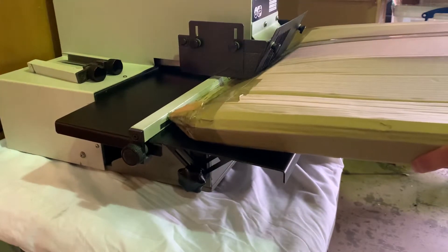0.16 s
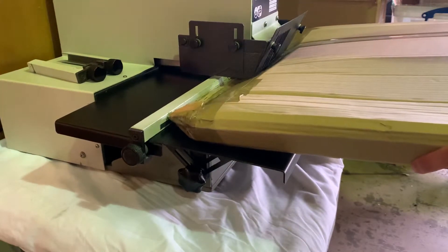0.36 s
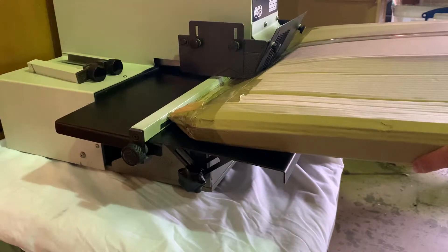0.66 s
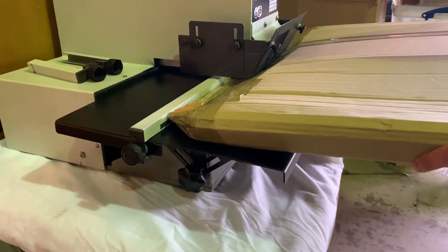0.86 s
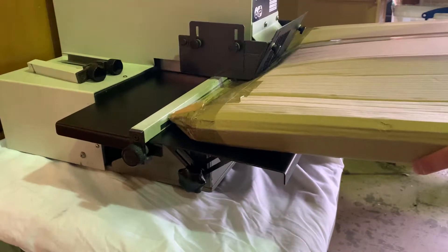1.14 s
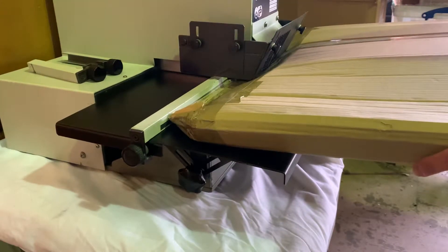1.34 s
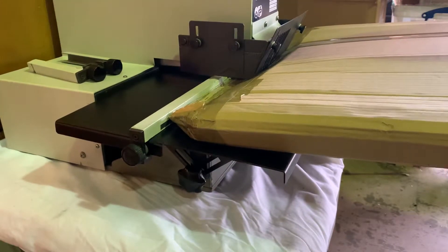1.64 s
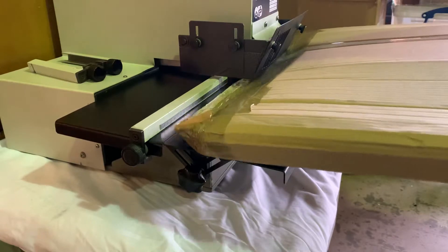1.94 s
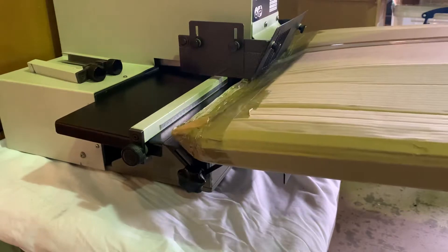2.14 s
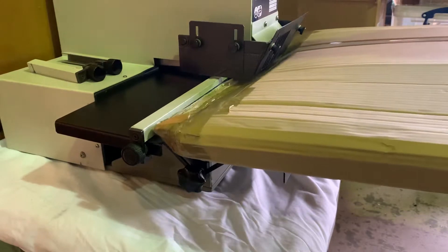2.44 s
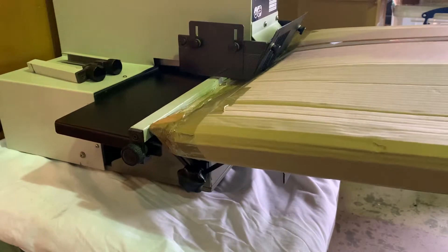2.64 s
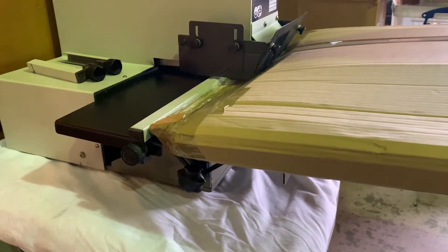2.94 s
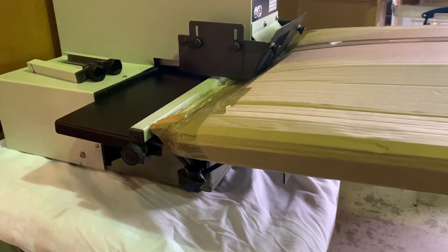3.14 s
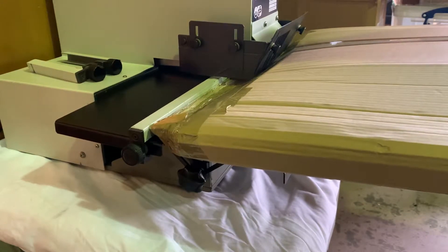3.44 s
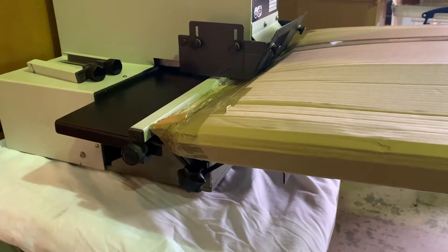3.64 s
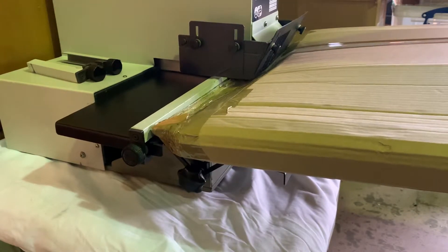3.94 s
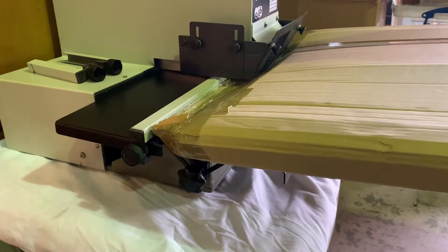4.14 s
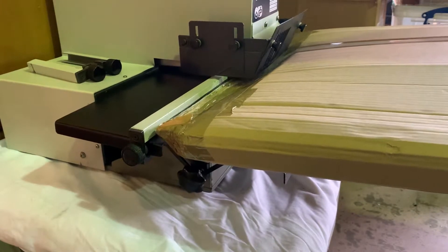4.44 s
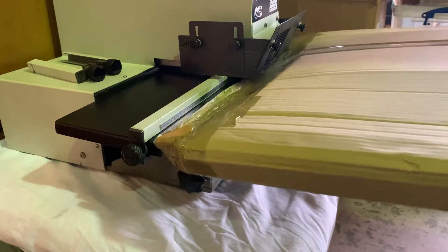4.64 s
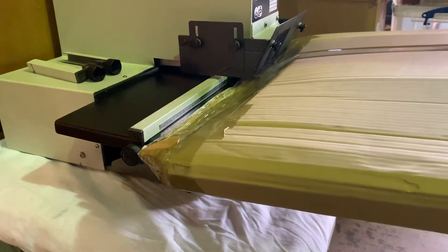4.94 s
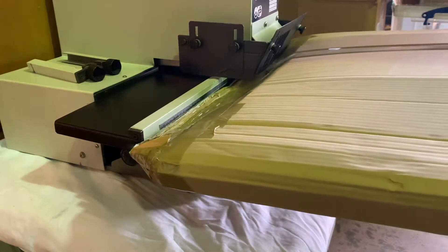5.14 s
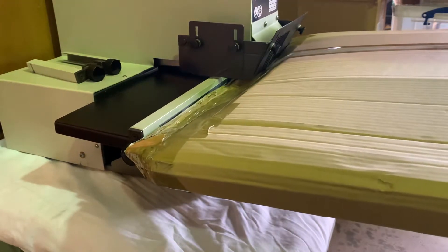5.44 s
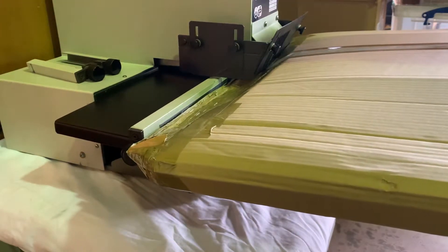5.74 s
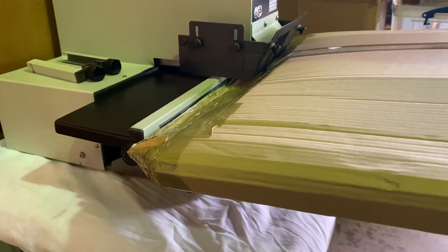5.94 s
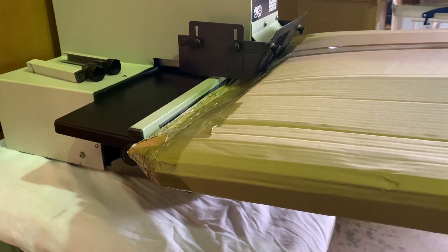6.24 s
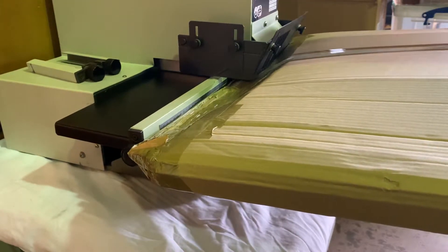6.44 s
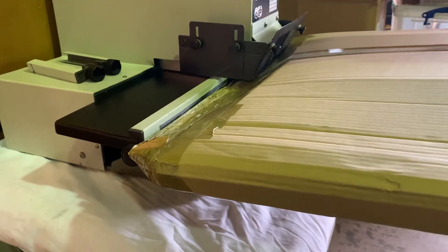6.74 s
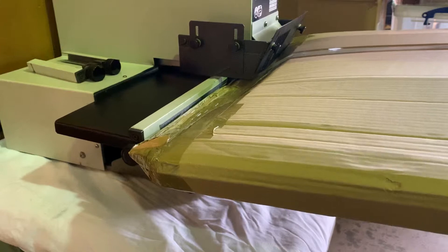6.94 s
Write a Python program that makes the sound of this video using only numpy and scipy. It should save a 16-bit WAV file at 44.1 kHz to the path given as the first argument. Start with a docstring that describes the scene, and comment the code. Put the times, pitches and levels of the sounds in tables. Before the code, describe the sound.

An electric stapler clatters through cardboard three times, with the wrapped cardboard sliding and crackling between strokes in a quiet workshop.

```python
"""A quiet workshop, a two-port stereo microphone close to an electric stapler on a steel table.
It runs three cycles: trigger, clutch, cam, staple blow, release and return. Each contact chatters
into the frame and the steel head; cam and gears rub and the table rumbles while the drive turns.
Between cycles the wrapped cardboard slides, knocks and crackles. Ventilation hums far off."""
import sys
import numpy as np
from scipy import signal
from scipy.fft import rfft, irfft, next_fast_len
from scipy.io import wavfile

SR = 44100
rng = np.random.default_rng(int(sys.argv[2]) if len(sys.argv) > 2 else 0)


def waveform_to_disk(signal):
    """Save audio, clipped to [-1, 1], as 16-bit WAV at the path in sys.argv[1]."""
    frames = np.transpose(np.atleast_2d(signal))
    scaled = np.clip(frames, -1, 1) * 32767
    samples = np.round(scaled).astype(np.int16)
    wavfile.write(sys.argv[1], SR, samples)


N = 312228

# when the clutch bites and how late the cam follows (their sum starts cam time): clutch_s, cam_lag_s
CYCLE_TIMES = [(0.764, -0.002), (3.539, 0.0026), (6.13, 0.012)]
# how alike the two microphone ports hear spread-out sound: frequency_hz, shared_power_fraction
PORT_LIKENESS = [(60, 0.91), (250, 1), (600, 0.53), (1100, 0.8), (1600, 0.27), (6000, 0.095), (8500, 0.077),
                 (10000, 1)]


def from_db(db):
    """Decibels to gain."""
    return 10 ** (np.asarray(db) / 20)


def rms_one(x):
    """Scale to unit rms."""
    return x / np.sqrt(np.mean(x ** 2) + 1e-20)


def power_sum(levels_db):
    """Levels of unrelated sounds add as powers."""
    return 10 * np.log10(np.sum(10 ** (np.array(levels_db) / 10), axis=0))


def in_time(rows):
    """Columns of a curve, one value a sample."""
    times_s, *columns = np.transpose(rows)
    return [np.interp(np.arange(N) / SR, times_s, column) for column in columns]


def every_cycle(curve):
    """Level curves in cam time, played once a cycle, silent outside."""
    quiet = [-120] * (len(curve[0]) - 1)
    padded = [(curve[0][0] - .01, *quiet), *curve, (curve[-1][0] + .01, *quiet)]
    return power_sum([in_time([(clutch_s + lag_s + t, *levels) for t, *levels in padded])
                      for clutch_s, lag_s in CYCLE_TIMES])


def at_hz(points, hz):
    """Read a spectrum on a log-frequency axis."""
    points = np.array(points)
    return np.interp(np.log(np.maximum(hz, 1)), np.log(points[:, 0]), points[:, 1])


def shaped(x, spectrum):
    """Colour a steady noise with rows of frequency_hz, gain_db."""
    return irfft(rfft(x) * from_db(at_hz(spectrum, np.fft.rfftfreq(N, 1 / SR))), N)


def band(x, low_hz, high_hz):
    """Causal band-pass."""
    sos = signal.butter(2, [low_hz, min(high_hz, .45 * SR)], "band", fs=SR, output="sos")
    return signal.sosfilt(sos, x)


def resonance(x, hz, width_hz):
    """Two-pole peak of gain 1."""
    r = np.exp(-np.pi * width_hz / SR)
    feedback = [1, -2 * r * np.cos(2 * np.pi * hz / SR), r * r]
    return signal.lfilter(np.array([1, 0, -1]) * (1 - r * r) / 2, feedback, x + 1e-18)


def grains(count, per_s, spread_db):
    """Random clicks of uneven size and sign."""
    sizes = from_db(spread_db * np.minimum(rng.exponential(1, count), 4)) * rng.choice([-1, 1], count)
    return sizes * (rng.random(count) < per_s / SR)


def blend_ports(spectra, size):
    """Three spectra become left and right: the first is shared, the others are each port's own."""
    alike = np.clip(at_hz(PORT_LIKENESS, np.fft.rfftfreq(size, 1 / SR)), 0, 1)
    shared, *own = spectra
    return np.sqrt(alike) * shared + np.sqrt(1 - alike) * np.array(own)


def two_ports(draw):
    """A wide source at the microphone, made from three draws of its sound."""
    return irfft(blend_ports(rfft([draw(), draw(), draw()]), N), N)


def room_tone():
    """Distant ventilation with a few faint motor lines."""
    # colour of the moving air: frequency_hz, gain_db
    air_spectrum = [(18, -31.5), (30, 1), (59, -14.5), (134, -15.5), (184, -13.5), (252, -27), (311, -29.5),
                    (780, -41), (844, -38.5), (8520, -76.5), (10800, -63.5), (16000, -85.5)]
    # motor hum: pitch_hz, width_hz, level_db
    motor_lines = [(770, 7.4, -70.5), (335, 12, -71.5), (592, 8.4, -76)]
    air = shaped(two_ports(lambda: rng.standard_normal(N)), air_spectrum)
    air = signal.sosfilt(signal.butter(2, 230, "high", fs=SR, output="sos"), air)
    hum = sum(from_db(level_db) * rms_one(resonance(rng.standard_normal(N), hz, width_hz))
              for hz, width_hz, level_db in motor_lines)
    return from_db(-55.5) * rms_one(air) + hum


def rubbing(levels_db, grit, rough_db):
    """Surfaces rubbing on steel: noise with a little grit, catching and slipping."""
    # colour of the low rasp: frequency_hz, gain_db
    rasp_spectrum = [(150, -17), (250, -5.5), (402, -11.5), (531, -8.5), (662, -20), (744, -15.5),
                     (4000, -22), (5200, -30.5), (8800, -120)]
    # colour of the high hiss: frequency_hz, gain_db
    hiss_spectrum = [(1500, -25), (2300, -4.5), (2900, -9.5), (5200, -8), (7000, -4.5), (10200, -4.5),
                     (13300, -7), (16000, -13.5)]

    def friction():
        return rng.standard_normal(N) + grit * rms_one(grains(N, per_s=300, spread_db=4.0))

    rasp_db, hiss_db, scrape_db = levels_db
    catch = from_db(rough_db * rms_one(band(rng.standard_normal(N), 11, 60)))
    scrape = rms_one(resonance(resonance(two_ports(friction), 3750, 600.0), 3750, 600.0))
    scrape += from_db(-7.0) * rms_one(resonance(two_ports(friction), 2300, 300.0))
    rasp = rms_one(shaped(two_ports(friction), rasp_spectrum))
    hiss = rms_one(shaped(two_ports(friction), hiss_spectrum))
    return catch * (from_db(scrape_db) * scrape + from_db(rasp_db) * rasp + from_db(hiss_db) * hiss)


def cardboard_slides():
    """Cardboard pushed over the table: each push speeds up, slows a little and stops."""
    # pushes, with levels at their fastest: start_s, fastest_s, stop_s, rasp_db, hiss_db, scrape_db
    pushes = [(-.3, 0, .04, -57, -59, -73), (1.562, 1.72, 1.946, -44, -37, -55),
              (2.101, 2.338, 2.58, -53, -57, -72), (2.734, 2.842, 2.91, -61, -65, -78),
              (3.0, 3.1, 3.13, -65.5, -64, -82), (4.34, 4.644, 4.76, -46, -48, -52),
              (4.81, 5.18, 5.24, -52, -57, -76), (5.3, 5.851, 6.1, -72.5, -80, -90),
              (6.885, 7.096, 8.6, -42, -44.5, -67)]
    rise_db, sag_db = np.array([3, 11, 10]), np.array([0.5, 7, 2])   # rasp, hiss, scrape
    start_db_per_s, stop_db_per_s = 302, 201
    curves = [in_time([(start_s - 1, *(top_db - rise_db - start_db_per_s)),
                       (start_s, *(top_db - rise_db)),
                       (fastest_s, *top_db),
                       (stop_s, *(top_db - sag_db)),
                       (stop_s + 1, *(top_db - sag_db - stop_db_per_s))])
              for start_s, fastest_s, stop_s, *top_db in pushes]
    return rubbing(power_sum(curves), grit=0.44, rough_db=1.0)


def table_rumble():
    """Each low mode of table and frame is a steady tone plus narrow noise, so that it wavers."""
    # shaking through one cycle: cam_time_s, rumble_db, table_db, panel_db
    cycle_shake = [(-.02, -70, -66, -60), (.02, -53, -53, -42.5), (.12, -47, -38.5, -38),
                   (.21, -36.5, -21.5, -31.5), (.25, -35.5, -33, -23), (.32, -30, -35.5, -30.5),
                   (.38, -39.5, -23.5, -24), (.46, -41, -34, -35.5), (0.511, -34, -36.5, -42.5),
                   (0.551, -43.5, -30.5, -51.5), (.61, -33, -30, -20.5), (.66, -45, -27, -18),
                   (.72, -30, -35, -26), (.85, -42, -35, -40), (1.2, -55.5, -45.5, -49),
                   (1.8, -70, -69, -58)]
    # murmur of table and building between cycles: time_s, rumble_db, table_db, panel_db
    murmur = [(0, -49.5, -46.5, -53), (.3, -47, -71, -52), (.7, -55, -65.5, -59.5), (2.2, -49, -51.5, -53),
              (2.8, -51.5, -66.5, -49), (3.45, -43.5, -54.5, -57.5), (4.9, -47, -51, -39.5),
              (5.3, -50.5, -65, -60), (5.92, -40.5, -56.5, -60.5), (7.08, -48, -49.5, -57)]
    # the rumble, table and panel modes: pitch_hz, width_hz, steady_power_fraction
    low_modes = [(53, 39, 0.1), (91.9, 16, 0.1), (178.6, 16, 0.45)]
    levels_db = power_sum([every_cycle(cycle_shake), in_time(murmur)])
    out, t = 0, np.arange(N) / SR
    for level_db, (hz, width_hz, steady) in zip(levels_db, low_modes):
        tone = np.sqrt(2 * steady) * np.sin(2 * np.pi * hz * t)
        waver = rms_one(resonance(resonance(rng.standard_normal(N), hz, width_hz), hz, width_hz))
        out = out + from_db(level_db) * (tone + np.sqrt(1 - steady) * waver)
    return out


def wrap_snaps():
    """Plastic wrap snaps: a double click through a short, high resonance, a wisp of crinkle behind."""
    # snaps of the wrap: start_s, relative_level_db, centre_hz
    snaps = [(0.53, -56, 2000), (2.0012, -28, 9500), (2.346, -54, 3350), (2.386, -39, 10500),
             (2.3954, -41, 10500), (2.463, -37, 3420), (2.4635, -35, 9830), (2.4794, -50, 3670),
             (2.5458, -43, 3550), (2.5794, -56.5, 4410), (2.7836, -22.5, 10300), (2.827, -34.5, 3829),
             (2.8462, -20, 10200), (2.951, -57, 3300), (3.113, -54, 8040), (3.468, -57, 3290),
             (4.869, -35, 3000), (5.0143, -39.5, 5938), (5.1779, -31, 9950), (5.1953, -46, 3520),
             (5.238, -31.5, 10400), (5.4491, -57, 5010), (5.4799, -55, 3500), (5.5191, -50, 4780),
             (5.6347, -44.5, 10100), (5.6752, -50, 3760), (5.681, -49, 3060), (5.8332, -49, 13700),
             (5.876, -29.5, 10220)]
    out, t = np.zeros(N), np.arange(SR // 20) / SR
    for start_s, level_db, hz in snaps:
        force = from_db(-32.0 - 950 * t) * rng.standard_normal(len(t))
        force[[0, round(.0003 * SR)]] += .2, 1   # the double click
        click = resonance(force, hz, 0.5 * hz) + from_db(-17.0) * band(force, 1030, 6600)
        out[round(start_s * SR):][:len(t)] += from_db(level_db + 7.5) * click / np.abs(click).max()
    return out


def chatter(contacts, per_s, spread_db, crack, knock_s, clack_db):
    """Each contact is a dying hail of micro-impacts in four bands; the part struck adds two notes."""
    # thud, knock, clack and tick of an impact: low_hz, high_hz, gain_db, rise_s
    bands = [(86, 520, 1.5, 0.0078), (328, 1190, -4.5, 0.0014), (1440, 4080, 1, 0.0033),
             (5830, 13100, -0.5, 0.0004)]
    forces, notes, t = np.zeros((len(bands), N)), np.zeros(N), np.arange(SR // 4) / SR
    rise = 1 - np.exp(-t / np.array(bands)[:, 3:])   # heavy parts take longer to get moving
    for start_s, level_db, *band_db, t60, knock_hz, clack_hz, note_db in contacts:
        hail = rms_one(grains(len(t), per_s, spread_db)) * from_db(-60 * t / max(t60, .01))
        hail *= 1 + crack * t / 0.0043 * np.exp(-t / 0.0018)   # the first touch is the hardest
        at = round(start_s * SR)
        gains = from_db(level_db + np.array(band_db))[:, None]
        forces[:, at:at + len(t)] += (gains * rise * hail)[:, :N - at]
        knock = from_db(note_db) * np.sin(2 * np.pi * knock_hz * t) * t / knock_s * np.exp(-t / knock_s)
        clack = from_db(band_db[2] + clack_db) * resonance(hail, clack_hz, 130.0)
        notes[at:at + len(t)] += from_db(level_db) * (knock + clack)[:N - at]
    # narrow bands catch little of a click and are raised; signs alternate so that neighbours add
    return notes + sum((-1) ** k * band(force, low, high) * from_db(db) * np.sqrt(SR / 2 / (high - low))
                       for k, (force, (low, high, db, _)) in enumerate(zip(forces, bands)))


def stapler_contacts():
    """Trigger to return, each contact is heard directly and ringing through frame and steel head."""
    # one cycle: after_clutch_s, cycle1_db, cycle2_db, cycle3_db, thud_db, knock_db, clack_db, tick_db,
    # chatter_t60_s, knock_hz, clack_hz, knock_note_db
    cycle = [(-.025, -40.5, -40.5, -41, -20, -5.5, -8, -16, 0.79, 853, 3300, -5),
             (0, -12.5, -14.5, -17, -31, -8, -4.5, -13, 0.12, 534.6, 2610, 5.5),
             (.025, -16.5, -13.5, -15, -15.5, -7.5, -25.5, -19, 0.12, 1055, 2130, -2.5),
             (.088, -23.5, -24.5, -18.5, -3, -15.5, -20, -20, 0.15, 400, 1700, -10.5),
             (0.0994, -36.5, -35.5, -22, -5.5, -6, -17, -21, .12, 423.6, 1910, -6),
             (.143, -24.5, -24.5, -23.5, -2.5, -6.5, -23.5, -20, .12, 401.7, 1900, -3.5),
             (.165, -9.5, -10.5, -13, -6.5, -14, -10.5, -8, 0.075, 1007, 2230, -16),
             (.197, -9.5, -12.5, -12, -8, -13.5, -20.5, -35, 0.17, 420, 2300, -7),
             (.222, -8, -8.5, -8.5, -5, -10, -19.5, -24, 0.1, 472.3, 1900, -13.5),
             (.306, -29.5, -37, -36, 4.5, -6.5, -19, -6.5, 0.19, 396, 1800, -3.5),
             (.322, -20, -42.5, -44.5, -9.5, -11, -11.5, -5, .1, 497, 2120, -8),
             (.342, -6, -5.5, -6.5, -8.5, -7.5, -11.5, -13, 0.18, 760, 2300, -9.5),
             (.364, 2, -0.5, 2, -11.5, -10, -24.5, -15.5, 0.092, 422, 1800, -4.5),
             (.383, -7.5, -13, -9, -4, -20.5, -15.5, -39, .12, 440, 1800, -5.5),
             (.583, -11.5, -12, -12, -3, -2.5, -18, -21.5, .14, 765, 2080, 5),
             (.604, -18, -14.5, -14.5, -0.5, -12.5, -8.5, -10.5, .11, 677.4, 4000, -8.5),
             (0.6318, -2, -2, -2.5, -6, -3, -9.5, -13, 0.12, 480, 1800, 1),
             (.648, -7.5, -6, -8, -14.5, -15, -28.5, -18.5, .07, 482, 2200, -1.5),
             (.668, -5.5, -10.5, -7.5, -7, -11, -16.5, -14, .1, 483.6, 4400, -8.5),
             (0.689, -12.5, -16, -15, -9, -17, -19.5, -33, .09, 450, 1870, -8)]
    # modes of frame and head: pitch_hz, gain_db, t60_s
    steel_modes = [(182, 1.5, 0.28), (212.4, 11.5, 0.33), (247, 2.5, 0.067), (321.3, 2.5, 0.23),
                   (368, -20.5, 0.52), (468, -12.5, 0.11), (543, -14, 0.06), (563, -11, 0.65),
                   (801, -13.5, 0.2), (918, -0.5, 0.09), (1077, 2.5, 0.025), (1176, -3.5, 0.1),
                   (1290, -27.5, 0.15), (1440, -8, .1), (1031, -8.5, 0.096), (1823, -7.5, 0.18),
                   (2175, -4.5, 0.14), (2751, -9.5, .05), (2863.6, -9.5, 0.15), (3680, -1.5, 0.074),
                   (3110, -4.5, 0.068), (4560, -11.5, 0.07), (6170, -11, 0.02), (6390, -4, 0.18),
                   (7560, -14.5, 0.079), (8870, -8, 0.017), (10560, -29, .05), (13250, -8.5, .05)]
    cam_engages_s = .1   # contacts after this wait for the cam
    contacts = [(clutch_s + row[0] + lag_s * (row[0] > cam_engages_s), row[1 + k], *row[4:])
                for k, (clutch_s, lag_s) in enumerate(CYCLE_TIMES) for row in cycle]
    force = chatter(contacts, per_s=3500, spread_db=4.0, crack=0.93, knock_s=0.0032, clack_db=12.0)
    ring = 0
    for k, (hz, gain_db, t60) in enumerate(steel_modes):
        mode = resonance(force, hz, width_hz=np.log(1000) / np.pi / t60)
        ring = ring + (-1) ** k * from_db(gain_db) * mode * np.sqrt(hz * t60)
    return from_db(-0.5) * force + from_db(-15.0) * ring


def clutch_squeals():
    """The clutch squeals as it bites: a slightly rising tone with its octave, swelling and dying."""
    # one squeal a cycle: start_s, pitch_hz, level_db, length_s
    squeals = [(0.776, 1039, -21.5, 0.031), (3.56, 1009, -27.5, 0.036), (6.146, 1046, -13.5, 0.017)]
    out = np.zeros(N)
    for start_s, hz, level_db, length_s in squeals:
        t = np.arange(int(length_s * SR)) / SR
        phase = 2 * np.pi * hz * t * (1 + 0.059 * (t / length_s - 1))
        swell = from_db(level_db) * np.sin(np.pi * t / length_s) ** 2
        out[round(start_s * SR):][:len(t)] += swell * (np.sin(phase) + 0.18 * np.sin(2 * phase))
    return out


def drive_rub():
    """Cam and gears rub while the drive turns."""
    # friction through one cycle: cam_time_s, rasp_db, hiss_db, scrape_db
    drive_levels = [(.03, -66, -85.5, -90.5), (.11, -46.5, -54.5, -66), (.15, -37.5, -41.5, -57.5),
                    (.172, -28.5, -44.5, -53.5), (.245, -41, -50, -54.5), (.42, -44.5, -55, -57.5),
                    (.56, -41, -52, -55.5), (.67, -40, -52, -53.5), (.74, -38, -50, -55),
                    (.85, -44.5, -62, -53), (.95, -45, -85, -85)]
    return rubbing(every_cycle(drive_levels), grit=0.86, rough_db=-2.5)


def cardboard_knocks():
    """The carton bumps on the table and its hollow resonates."""
    # bumps: start_s, level_db, thud_db, knock_db, clack_db, tick_db,
    # chatter_t60_s, knock_hz, clack_hz, knock_note_db
    knocks = [(1.827, -24.5, -14.5, -3, -27, -30, 0.066, 344, 2400, -7),
              (2.307, -19, -7.5, -12, -32, -20.5, 0.094, 404.4, 1850, -11.5),
              (2.324, -24, -1.5, -22.5, -21.5, -38, 0.071, 284.2, 2200, -13),
              (2.385, -26.5, -10.5, -24, -26.5, -22, 0.072, 340, 2020, -7.5),
              (2.653, -42, -2, -29.5, -25, -34.5, 0.088, 301, 2650, -7.5),
              (5.125, -43, -21.5, -13, -8, -46, 0.1, 278, 2120, -15.5),
              (5.186, -30.5, -5.5, -15, -22, -27, 0.094, 299.3, 3325, -12),
              (5.397, -43.5, 3.5, -21.5, -34, -46.5, 0.062, 588, 1456, 0),
              (5.521, -43, -12.5, 4, -10, -26, 0.0495, 298, 1645, -9.5)]
    # hollow of the carton: pitch_hz, width_hz, gain_db
    hollow = [(211, 18, 9.5), (282, 17, 5), (387, 29, 0.5)]
    bumps = two_ports(
        lambda: chatter(knocks, per_s=3100, spread_db=0.0, crack=3.5, knock_s=0.011, clack_db=15.0))
    return bumps + sum(from_db(db) * resonance(bumps, hz, width_hz) for hz, width_hz, db in hollow)


def workshop_reverb(x, low_t60, high_t60, wet_db):
    """The room answers with a noise tail, partly its own in each port, whose treble dies first."""
    t = np.arange(SR // 2) / SR
    noise = rng.standard_normal((3, len(t)))
    dull = signal.sosfilt(signal.butter(1, 2500, fs=SR, output="sos"), noise)
    tail = dull * from_db(-60 * t / low_t60) + (noise - dull) * from_db(-60 * t / high_t60)
    tail *= np.minimum(t / 0.011, 1)
    size = next_fast_len(N + len(t))
    response = from_db(wet_db) * rfft(tail / np.sqrt(np.sum(tail[0] ** 2)), size)
    return irfft(rfft(x, size) * blend_ports(response, size), size)[:, :N]


def scene():
    """The machine is wide, so each port hears its own micro-impacts; the rumble reaches both alike."""
    knocks = cardboard_knocks()
    near = two_ports(stapler_contacts) + knocks + wrap_snaps() + clutch_squeals()
    diffuse = cardboard_slides() + drive_rub() + room_tone()
    direct = table_rumble() + diffuse + near
    return direct + workshop_reverb(near.mean(axis=0), low_t60=0.42, high_t60=0.14, wet_db=-11.5)


def record(dry):
    """The microphone: right port late in the bass, left in the treble; rounded peaks, top cut off."""
    # balance of the ports: frequency_hz, left_minus_right_db
    balance = [(60, 1.5), (110, -5), (200, 2), (380, -2), (700, 0.5), (1290, 1.5), (2380, -0.5),
               (4400, -0.5), (8120, -1.5), (15000, 1)]
    left_lag_s, right_lag_s, crossover_hz, cutoff_hz = .000298, .00014, 4600, 16700
    hz = np.fft.rfftfreq(N, 1 / SR)
    treble = (1 + np.tanh((hz - crossover_hz) / 500)) / 2
    lag_s = np.array([treble * left_lag_s, (1 - treble) * right_lag_s])
    roll_off_db = at_hz([(14200, -1), (15400, -2.0)], hz)
    colour_db = at_hz(balance, hz) / 2 * [[1], [-1]] + roll_off_db
    ports = irfft(rfft(dry) * from_db(colour_db) * np.exp(-2j * np.pi * hz * lag_s), N)
    rounded = .93 * np.tanh(ports / .93)
    return signal.sosfilt(signal.cheby2(16, 95, cutoff_hz, fs=SR, output="sos"), rounded)


dry = scene()
out = record(dry)
waveform_to_disk(out)
```